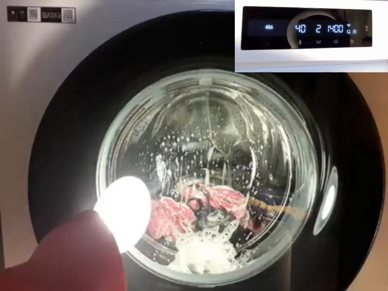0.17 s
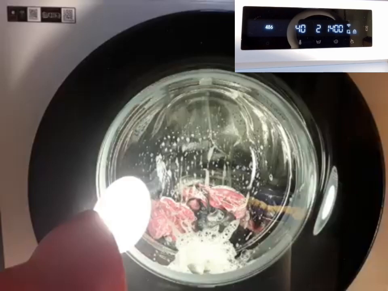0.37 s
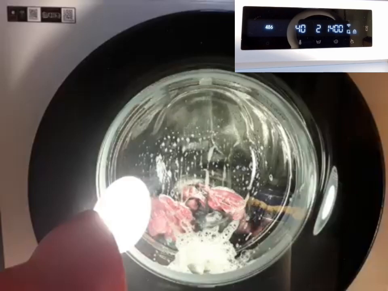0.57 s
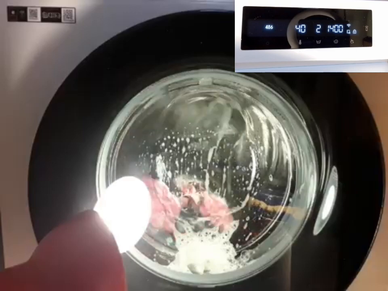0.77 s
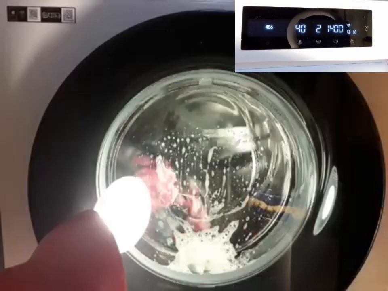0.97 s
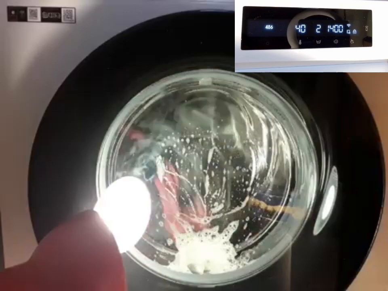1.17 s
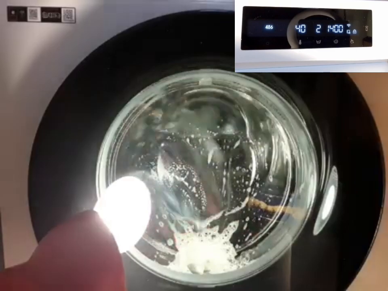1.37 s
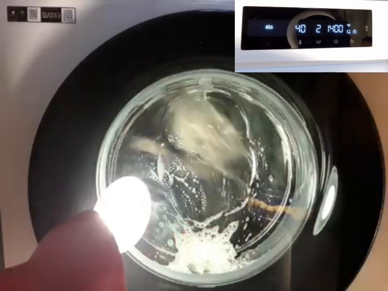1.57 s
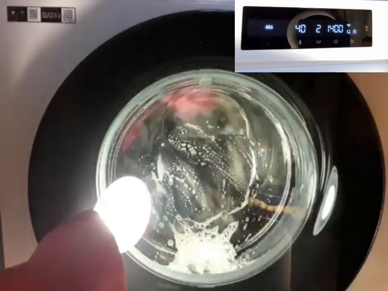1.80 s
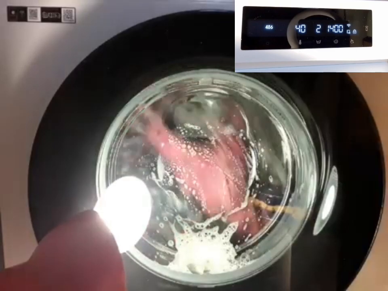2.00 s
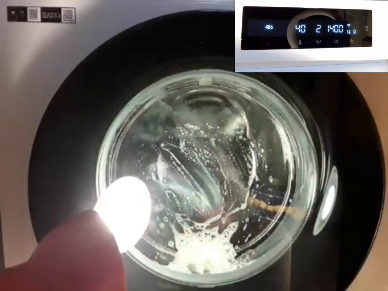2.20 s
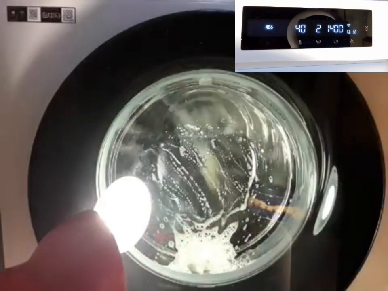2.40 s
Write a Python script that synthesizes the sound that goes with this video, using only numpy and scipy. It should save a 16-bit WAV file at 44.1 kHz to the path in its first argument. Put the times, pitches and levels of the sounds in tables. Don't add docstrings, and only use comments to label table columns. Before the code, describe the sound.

Close at a washing machine door: quiet hiss and thin high whine, a short motor hum, faint rubbery squeaks, then sloshing water and irregular heavy laundry thuds shaking the metal cabinet, loudest at the end.

```python
import sys
import numpy as np
from scipy import signal
from scipy.fft import rfft, irfft, next_fast_len
from scipy.io import wavfile
from scipy.ndimage import uniform_filter1d, map_coordinates

SR = 44100
rng = np.random.default_rng(int(sys.argv[2]) if len(sys.argv) > 2 else 0)


def store_pcm(level_fs):
    pcm = np.round(np.clip(level_fs, -1, 1) * 32767).astype(np.int16)
    wavfile.write(sys.argv[1], SR, np.atleast_2d(pcm).T)


def volts_from_db(level):
    exponent = np.asarray(level, float) / 20
    return 10 ** exponent


N = 107912


def unit(x):
    return x / np.sqrt(np.mean(x ** 2) + 1e-20)


def along(points, hz):
    f, value = np.transpose(points)
    return np.interp(np.log(hz + 1), np.log(f + 1), value)


def curves(rows):
    s, *columns = np.transpose(rows)
    return [np.interp(np.arange(N) / SR, s, column) for column in columns]


def gate(rows, fade_s):
    t = np.arange(N) / SR
    to_edge = np.minimum(t - rows[0][0], rows[-1][0] - t)
    return np.clip(to_edge / fade_s, 0, 1)


def wobble(rate):
    knots = rng.standard_normal(1000)
    return map_coordinates(knots, [np.arange(N) * min(rate, 400) / SR])


def filtered(x, response):
    m = next_fast_len(N + SR // 2)
    return irfft(rfft(x, m) * response(np.fft.rfftfreq(m, 1 / SR)), m)[:N]


def rush(spectrum, patchy_db):
    z = signal.stft(rng.standard_normal(N), nperseg=512)[2]
    field = uniform_filter1d(rng.standard_normal(z.shape), size=4, axis=0)
    field = uniform_filter1d(field, size=8, axis=1)
    x = signal.istft(z * volts_from_db(patchy_db * unit(field)), nperseg=512)[1][:N]
    return unit(filtered(x, lambda hz: volts_from_db(along(spectrum, hz))))


def tone(hz, orders, colour=lambda f: 1):
    turn = 2 * np.pi * np.cumsum(hz) / SR
    return sum(np.sqrt(2) * volts_from_db(db) * colour(k * hz) * np.sin(k * turn) for k, db in orders)


def bursts(rows, attack_s, t60, blow=0):
    t = np.arange(N) / SR
    power = np.zeros(N)
    for s, db, hold in rows:
        u = t - s
        release = volts_from_db(db - 60 * np.clip(u - hold, 0, None) / t60)
        attack = np.clip(u / attack_s, 0, 1)
        first_blow = 1 + blow * np.exp(-np.abs(u) / 0.00097)
        power += (release * attack * first_blow) ** 2
    return np.sqrt(power)


def resonances(body, f):
    total = 0
    for k, (centre, width, db) in enumerate(body):
        damping = 1j * f * width
        total = total + (-1) ** k * volts_from_db(db) * damping / (centre * centre - f * f + damping)
    return total


# frequency in Hz, level in dB per Hz.
ROOM_COLOUR = [(12, -56), (20, 2), (32, 0), (204, -4.5), (235, -6.5), (276, -5.5), (338, -11), (507, -14.5),
               (2500, -41), (3250, -61), (5500, -120)]


def room():
    return volts_from_db(-67.5) * rush(ROOM_COLOUR, patchy_db=1.2)


# frequency in Hz, level in dB per Hz.
HISS_COLOUR = [(1500, -6.5), (5800, -16.5), (7800, -3), (9200, -4), (10500, -10.5), (12500, -4),
               (13100, -4), (15000, -20)]


def hiss():
    buzz_hz = 59.7
    pulses = np.cos(np.pi * buzz_hz * np.arange(N) / SR) ** 12
    return volts_from_db(-79) * unit((1 + 0.45 * pulses) * rush(HISS_COLOUR, patchy_db=1.5))


# time in seconds, pitch in Hz, level in dB.
WHINE_PATH = [(0, 11835, -82), (.1, 11860, -82), (.5, 11815, -82), (1.25, 11790, -80), (1.4, 11880, -80),
              (1.68, 12000, -81), (1.95, 11880, -81), (2.3, 11845, -80), (2.45, 11885, -80)]


def whine():
    jitter_hz, flutter_db, flutters_per_s, halo_hz = 22, 1.8, 120, 200
    hz, db = curves(WHINE_PATH)
    jittered_hz = hz + jitter_hz * wobble(2 * flutters_per_s)
    core = tone(jittered_hz, [(1, flutter_db * wobble(flutters_per_s))])
    slow_noise = unit(filtered(rng.standard_normal(N), lambda f: 1 / (1 + (f / halo_hz) ** 2)))
    halo = slow_noise * tone(hz, [(1, -3)])
    return volts_from_db(db) * (core + halo)


# frequency in Hz, level in dB per Hz.
SLOSH_COLOUR = [(24, -48), (45, -10), (120, 1), (250, -0.5), (430, -7), (620, -10), (1200, -18),
                (2500, -32.5), (5000, -50)]
# frequency in Hz, level in dB per Hz.
SPRAY_COLOUR = [(2500, -28), (4600, -12.5), (5610, -3.5), (6510, -7), (7510, -1), (9100, -17), (12100, -31),
                (14500, -40.5)]
# frequency in Hz, level in dB per Hz.
SLAP_COLOUR = [(700, -33), (1300, 2), (2100, 2), (2700, -4.5), (3400, -10), (4500, -19.5), (7000, -44)]
# time in seconds, level in dB.
CHURNING = [(0.6, -59.5), (0.712, -64), (0.83, -70.5), (0.952, -59), (1.29, -48), (1.398, -45),
            (1.686, -48.5), (1.864, -49), (2.076, -53.5), (2.234, -48), (2.31, -49.5), (2.44, -40)]
# start in seconds, spray level in dB, slap over spray in dB, hold in seconds.
SPLASHES_THROWN = [
    (1.061, -70, 3.5, 0.026),
    (1.135, -74, 15.5, 0.026),
    (1.391, -70, 12, 0.0062),
    (1.405, -75.5, 15.5, 0.1),
    (1.4989, -50, 12.5, 0.02),
    (1.764, -77, 9.5, 0.07),
    (2.186, -72.5, 15, 0.021),
    (2.235, -67.5, 6, 0.021),
    (2.378, -66, 8, 0.0147),
]
# start in seconds, pitch in Hz, level in dB, life in seconds.
BIG_BUBBLES = [
    (.19, 268, -60, 0.05),
    (.258, 495, -64.5, 0.022),
    (.95, 569, -48.5, 0.044),
    (1.04, 207, -64, 0.08),
    (1.04, 810, -70, 0.029),
    (1.87, 272, -53, 0.022),
    (2.132, 131.4, -27, 0.034),
    (2.14, 191, -40, 0.016),
    (2.175, 165.7, -44, 0.016),
    (2.135, 76.8, -33.5, 0.057),
]


def bubbles(rows):
    out = np.zeros(N + SR)
    t = np.arange(SR // 4) / SR
    for s, hz, db, life in rows:
        u = t / life
        swell = 3 * u * np.exp(-2 * u)
        out[round(s * SR):][:len(t)] += volts_from_db(db) * swell * np.sin(2 * np.pi * hz * t * (1 + 0.025 * u))
    return out[:N]


def gurgle():
    count, middle_hz, spread, cycles = 260, 350, 0.5, 5
    draw = np.clip(rng.standard_normal((count, 3)), -1.5, 1.5)
    hz = middle_hz * np.exp(spread * draw[:, 0])
    starts = np.sort(rng.uniform(0, N / SR, count))
    return unit(bubbles(zip(starts, hz, 4 * draw[:, 1], cycles / hz)))


def churned_water():
    churn_db, = curves(CHURNING)
    top = churn_db.max()
    fade_in = np.clip((np.arange(N) / SR - CHURNING[0][0]) / 0.21, 0, 1)
    gurgles = volts_from_db(-5.5) * gurgle()
    surge = volts_from_db(churn_db + 1.5 + 0.97 * wobble(10.69))
    slosh = surge * (rush(SLOSH_COLOUR, patchy_db=1.5) + gurgles)
    fizz = volts_from_db(top + 0.93 * (churn_db - top) - 30.5) * rush(SPRAY_COLOUR, patchy_db=0.8)
    return fade_in * (slosh + fizz)


def thrown_water():
    attack_s, t60 = 0.0031, 0.26
    spray_rows = [(s, db, hold) for s, db, _, hold in SPLASHES_THROWN]
    slap_rows = [(s, db + over_db, hold) for s, db, over_db, hold in SPLASHES_THROWN]
    spray = bursts(spray_rows, attack_s, t60) * rush(SPRAY_COLOUR, patchy_db=0.8)
    slap = bursts(slap_rows, attack_s, t60) * rush(SLAP_COLOUR, patchy_db=1.5)
    return (spray + slap) * volts_from_db(1.2 * wobble(210))


def water():
    return churned_water() + thrown_water() + bubbles(BIG_BUBBLES)


# time in seconds, peak in dB.
CLOTH_JOLTS = [(.448, -60.5), (.653, -65), (.662, -64), (.684, -58.5), (1.1406, -31.5), (1.1447, -30),
               (1.151, -28), (1.1623, -30.5), (1.170, -30.5), (1.186, -37), (1.197, -38.5), (1.240, -46),
               (1.395, -21.5), (1.404, -22.5), (1.416, -21), (1.421, -24.5), (1.430, -23), (1.438, -25.5),
               (1.450, -20.5), (1.473, -23.5), (1.492, -27.5), (1.498, -30), (2.187, -43), (2.241, -35),
               (2.262, -35), (2.324, -51), (2.3845, -14), (2.395, -16), (2.398, -19), (2.410, -17.5),
               (2.415, -16), (2.4285, -14)]
# frequency in Hz, width in Hz, level in dB.
DRUM_MODES = [(310, 64, 1), (441.4, 60, -2), (636, 106, 1), (889, 207, -5.5), (1314, 170, -15)]


def jolts():
    soft_hz = 2200
    blows = np.zeros(N)
    for s, db in CLOTH_JOLTS:
        blows[round(s * SR)] = volts_from_db(db)
    ring = lambda f: resonances(DRUM_MODES, f) / (1 + 1j * f / soft_hz) ** 4
    one_blow = filtered(np.arange(N) == 0, ring)
    return filtered(blows, ring) / one_blow.max()


# time in seconds, second order pitch in Hz, level in dB.
HUM_PATH = [
    (.648, 249, -65),
    (.67, 249, -53.5),
    (.71, 247, -73),
    (.8, 248, -59.5),
    (.85, 247, -66.5),
    (.96, 253, -59),
    (1.02, 250, -74),
]
# multiple of the pitch, level in dB.
HUM_MULTIPLES = [(.5, 2.5), (1, 3.5), (1.5, -8)]


def motor_hum():
    hz, db = curves(HUM_PATH)
    return gate(HUM_PATH, 0.017) * volts_from_db(db + 1.5 * wobble(30)) * tone(hz, HUM_MULTIPLES)


# start in seconds, level in dB, middle panels over it in dB,
# high panels over it in dB, hold in seconds.
LANDINGS = [(0.649, -56.5, -8.5, -20.5, 0.019), (0.945, -55.5, -20, -28, 0.032),
            (1.037, -52.5, -10, -10, 0.035), (1.1383, -34, -7, -29, 0.028), (1.391, -30.5, 1, -12.5, 0.04),
            (1.465, -35, -1, -0.5, 0.053), (1.495, -37, -9, -24, 0.024), (1.776, -49, -8.5, -7.5, 0.023),
            (1.854, -49, -6.5, -10.5, 0.0064), (2.005, -55, 1.5, -2.5, 0.027), (2.04, -49, -2, -9.5, 0.084),
            (2.185, -47, -0.5, 2, 0.016), (2.233, -39.5, -8, -9.5, 0.031), (2.378, -31, -1, 0.5, 0.042)]
# frequency in Hz, width in Hz, level in dB.
LOW_PANELS = [(160.6, 14.4, -3.5), (239.4, 18, -3), (307.4, 52, 0), (442, 36.6, 0.5)]
# frequency in Hz, width in Hz, level in dB.
MIDDLE_PANELS = [(598.7, 26, 5), (624.6, 51, 0), (730, 38.6, -2)]
# frequency in Hz, width in Hz, level in dB.
HIGH_PANELS = [(876, 86, 1), (935, 115, 0.5), (1146, 105, -4), (1304, 58, -3.5), (1552, 77, -11),
               (1760, 75, -13), (2130, 71, -16), (2540, 330, -40.5)]
# start in seconds, level in dB, hold in seconds.
TUB_BOOMS = [
    (.655, -64, 0.06),
    (1.145, -53, 0.048),
    (1.33, -69, .02),
    (1.42, -77.5, .03),
    (1.48, -38, 0.036),
    (2.13, -58, 0.043),
    (2.25, -43.5, 0.042),
    (2.38, -63, .05),
]
# frequency in Hz, width in Hz, level in dB.
TUB_MODES = [(70.4, 7.1, -3.5), (112.8, 24, 0), (167, 60, -3.5)]


def shaken(envelope, body, strikes=(), strike_delay_s=0.0):
    lumpy_db, lumps_per_s = 0, 120
    top_hz = body[-1][0]
    soft = lambda f: resonances(body, f) / (1 + 1j * f / (2 * top_hz)) ** 2
    push = unit(rng.standard_normal(N) * volts_from_db(lumpy_db * wobble(lumps_per_s)))
    force = envelope * push
    for s, db, _ in strikes:
        force[round((s + strike_delay_s) * SR)] += 18 * volts_from_db(db)
    return filtered(force, soft) / np.std(filtered(push, soft))


def laundry():
    attack_s, t60 = 0.00128, 0.21
    s, db, middle_db, high_db, hold = np.transpose(LANDINGS)
    out = shaken(bursts(TUB_BOOMS, attack_s=0.0082, t60=0.11), TUB_MODES)
    for over_db, panels in [(0, LOW_PANELS), (middle_db, MIDDLE_PANELS), (high_db, HIGH_PANELS)]:
        rows = list(zip(s, db + over_db, hold))
        out = out + shaken(bursts(rows, attack_s, t60, blow=0.13), panels, rows, attack_s)
    return out


# time in seconds, pitch in Hz, level in dB, second partial over it in dB.
SLIPS = [
    [(.905, 2060, -95, 2), (.947, 2390, -91, 2), (.949, 2850, -102, 14), (.975, 3090, -81, 3),
     (1.04, 3220, -76, -1), (1.11, 3180, -79, 5), (1.135, 2960, -79, 2), (1.2, 2990, -78, -3)],
    [(1.205, 2880, -82, -3), (1.222, 2920, -73, -1), (1.244, 3040, -74, 0), (1.254, 2860, -70, -14),
     (1.278, 2830, -74, -10), (1.286, 2940, -74, 4), (1.348, 2945, -76, 4), (1.364, 2800, -72, -20),
     (1.398, 2710, -73, -14)],
]


def squeak(slip):
    seal_cut_hz = 2550
    hz, db, over_db = curves(slip)
    hz = hz * (1 + 0.008 * wobble(250))
    colour = lambda f: 1 / (1 + (seal_cut_hz / f) ** 24)
    levels = [db, db + over_db, db - 21 + 2 * over_db]
    orders = [(k, level + 2.2 * wobble(91)) for k, level in enumerate(levels, 1)]
    return gate(slip, 0.0048) * tone(hz, orders, colour)


# frequency in Hz, t60 in seconds.
ROOM_DECAY = [(200, 0.18), (2000, 0.06), (10000, 0.063)]


def walls(x):
    hz, t, z = signal.stft(rng.standard_normal(SR // 2), SR, nperseg=256)
    decay = volts_from_db(-60 * t / along(ROOM_DECAY, hz)[:, None])
    tail = signal.istft(z * decay, SR, nperseg=256)[1]
    delayed = np.pad(x, (300, 0))
    return signal.fftconvolve(delayed, tail / np.linalg.norm(tail))[:N]


def scene():
    machine = laundry() + jolts() + water() + sum(map(squeak, SLIPS))
    floor = room()
    echo = volts_from_db(-11) * walls(machine)
    motor = motor_hum() + whine()
    return (machine + echo + motor + floor)[None]


def roll_off(x):
    return signal.sosfilt(signal.butter(12, 15030, fs=SR, output="sos"), x)


def record(dry):
    low_cut_hz, offset = 42, -0.0006
    heard = filtered(dry[0], lambda f: (1j * f / (low_cut_hz + 1j * f)) ** 2)
    mix = offset + (heard + hiss())[None]
    return roll_off(mix)


dry = scene()
out = record(dry)
store_pcm(out)
```